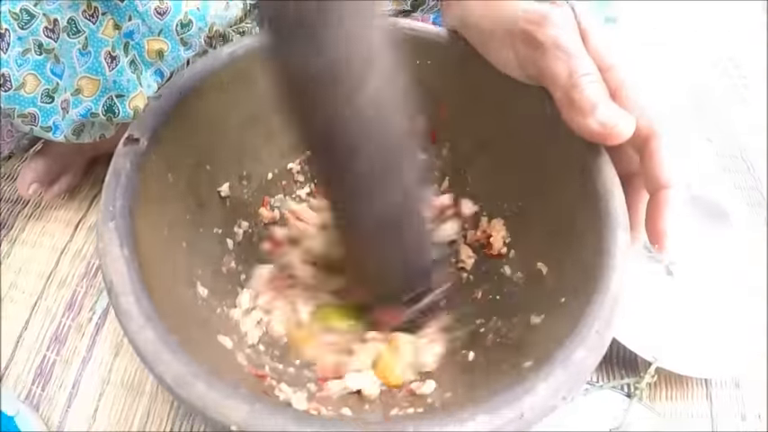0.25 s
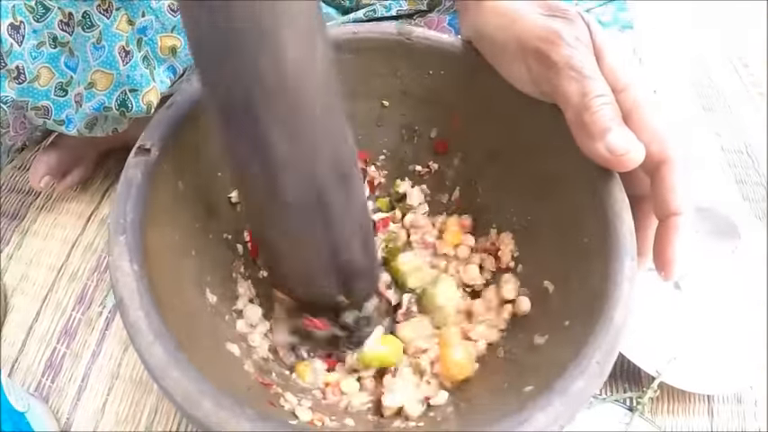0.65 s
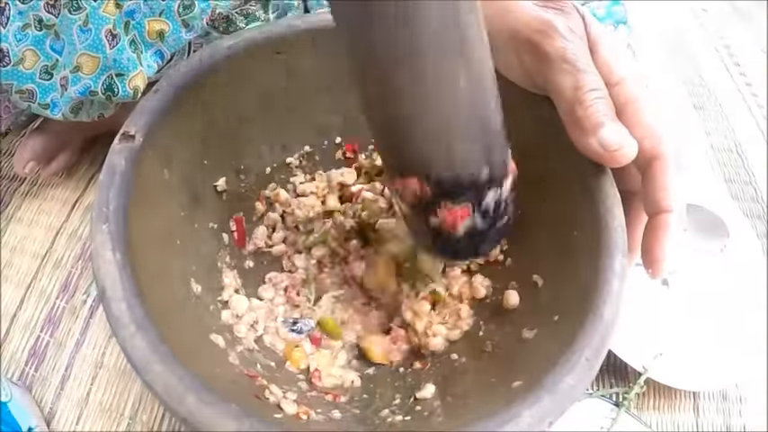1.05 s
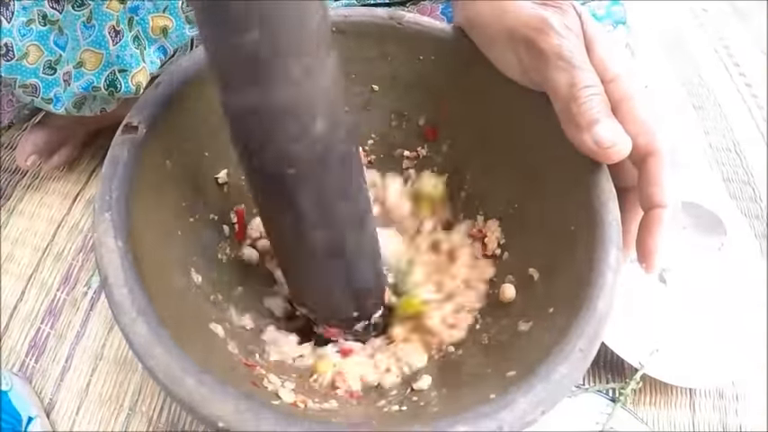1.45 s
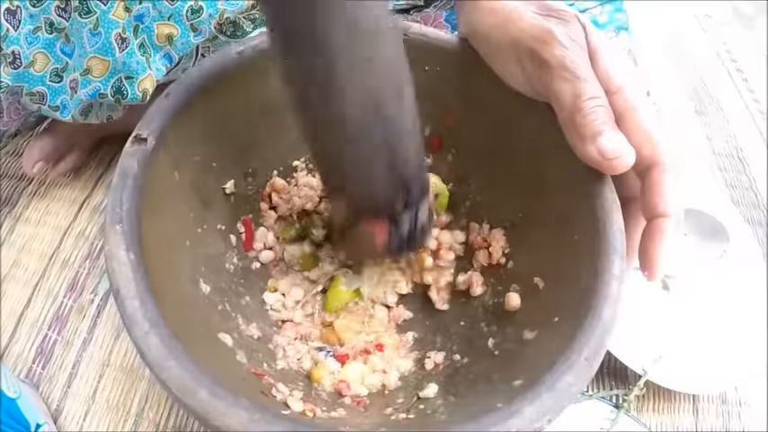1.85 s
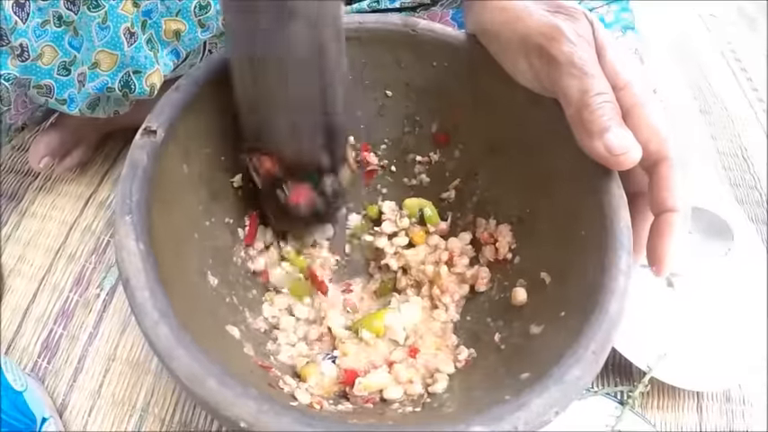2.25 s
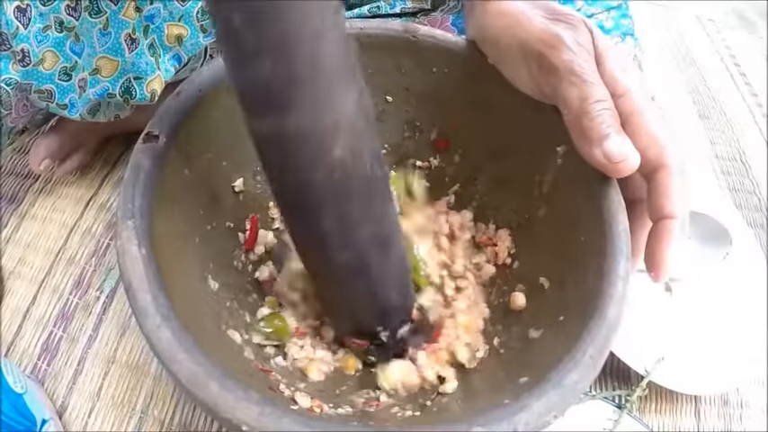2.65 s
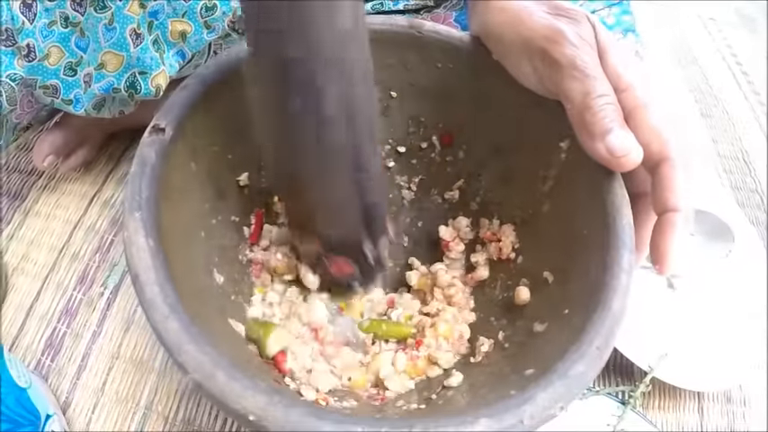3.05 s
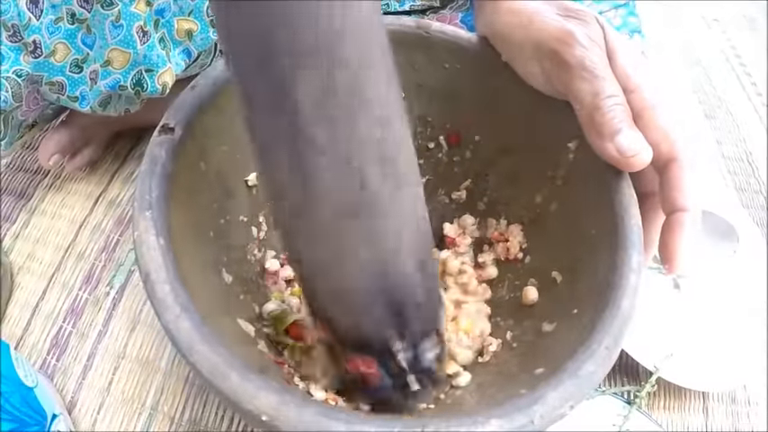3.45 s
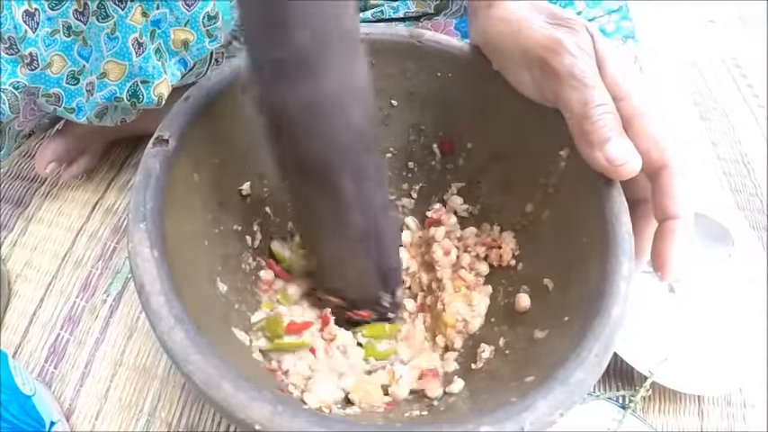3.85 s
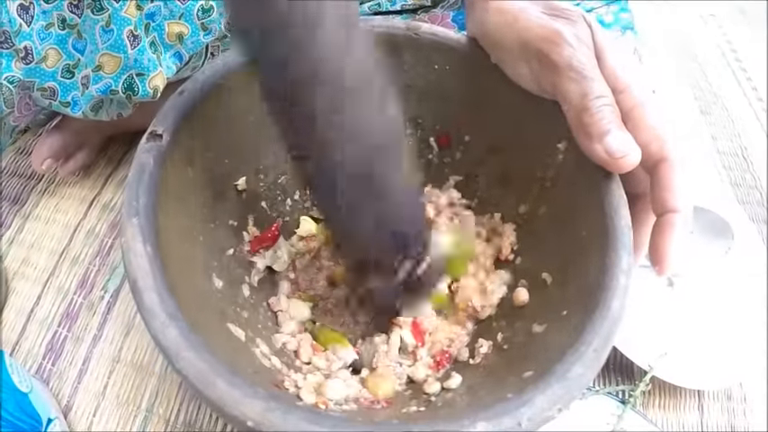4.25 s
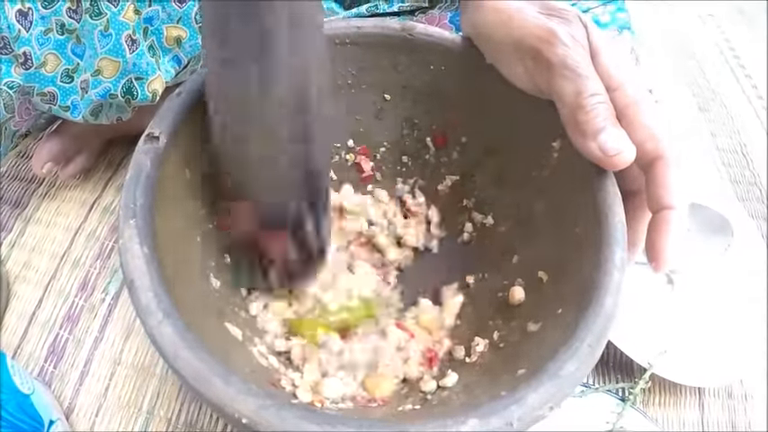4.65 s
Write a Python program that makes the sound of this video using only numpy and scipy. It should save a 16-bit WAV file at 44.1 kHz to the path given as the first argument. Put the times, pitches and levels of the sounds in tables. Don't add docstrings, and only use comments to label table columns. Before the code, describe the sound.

A wooden pestle pounds wet salad in a clay mortar, about three or four crunching strokes a second, with hollow knocks and brief rings.

```python
import sys
import numpy as np
from scipy import signal
from scipy.fft import rfft, irfft
from scipy.io import wavfile
from scipy.ndimage import uniform_filter1d

SR = 44100
rng = np.random.default_rng(int(sys.argv[2]) if len(sys.argv) > 2 else 0)


def convert_level_to_amplitude(level_db):
    exponent = np.asarray(level_db, float) / 20
    return 10 ** exponent


def transcribe(signal):
    frames = np.atleast_2d(signal).T
    limited = np.clip(frames, -1, 1)
    pcm = np.round(limited * 32767).astype(np.int16)
    wavfile.write(sys.argv[1], SR, pcm)


N = 216072


def rms_one(x):
    return x / np.sqrt(np.mean(x ** 2) + 1e-20)


def resonate(x, hz, width_hz):
    r = np.exp(-np.pi * width_hz / SR)
    zeros = [(1 - r * r) / 2, 0, (r * r - 1) / 2]
    poles = [1, -2 * r * np.cos(2 * np.pi * hz / SR), r * r]
    return signal.lfilter(zeros, poles, x)


def body(x, peaks):
    return rms_one(sum((-1) ** k * convert_level_to_amplitude(db) * resonate(x, hz, width_hz)
                       for k, (hz, width_hz, db) in enumerate(peaks)))


def decaying(t, hz, db, t60_s, phase=0.):
    return convert_level_to_amplitude(db - 60 * t / max(t60_s, .002)) * np.sin(2 * np.pi * hz * t + phase)


def add(out, s, sound):
    i = max(round(s * SR), 0)
    out[i:i + len(sound)] += sound[:N - i]


def flicker(per_s):
    r = np.exp(-2 * np.pi * per_s / SR)
    warm_up = 8000
    wander = signal.lfilter([1], [1, -2 * r, r * r], rng.standard_normal(N + warm_up))
    return rms_one(wander[warm_up:])


def grains(per_s, spread_db, clump_db):
    sizes = convert_level_to_amplitude(spread_db * np.minimum(rng.exponential(1, N), 4)) * rng.choice([-1, 1], N)
    happens = rng.random(N) < per_s / SR
    return sizes * happens * convert_level_to_amplitude(clump_db * flicker(66)) + 1e-18


# (frequency [Hz], width [Hz], level [dB])
BOWL_AIR_PEAKS = [(573, 120, -2), (639.3, 69.7, 9), (896, 252, -2), (1520, 674, -12.5), (467, 160, -24.5),
                  (2046, 130, -19.5)]
# (frequency [Hz], width [Hz], level [dB])
CRUNCH_PEAKS = [(3162, 990, 10.5), (3500, 600, 13.5), (4430, 600, 5), (6180, 1350, 0.5)]
# (frequency [Hz], width [Hz], level [dB])
FIZZ_PEAKS = [(7320, 2000, -3), (11150, 2000, -3.5), (15100, 4700, -3.5)]
# (frequency [Hz], width [Hz], level [dB])
MAT_PEAKS = [(54, 27, -1.5), (119, 19, 4.5), (213, 130, -13.5)]


def crushing():
    crunch_db, air_db, fizz_db, mat_db = stroke_levels()
    fine = grains(8200.0, spread_db=0.0, clump_db=-1.0)
    coarse = grains(1400.0, spread_db=3.0, clump_db=8.5)
    wet = np.clip((crunch_db + 58) / 18, .3, 1)
    crunch = body(rms_one(fine) + wet * rms_one(wet_pops(coarse)), CRUNCH_PEAKS)
    crunch = resonate(crunch, 3300, 4000)
    rumble = grains(2500.0, spread_db=1.5, clump_db=3.5)
    low = convert_level_to_amplitude(air_db) * body(rumble, BOWL_AIR_PEAKS) + convert_level_to_amplitude(mat_db) * body(rumble, MAT_PEAKS)
    spray = grains(6000, spread_db=3, clump_db=2.5)
    fizz = sum(convert_level_to_amplitude(db + 3 * flicker(45)) * resonate(spray, hz, width_hz)
               for hz, width_hz, db in FIZZ_PEAKS)
    fizz = convert_level_to_amplitude(fizz_db) * rms_one(fizz)
    crunch = convert_level_to_amplitude(crunch_db + 2.2 * flicker(30)) * rms_one(crunch)
    return crunch * pressed(.002, .012) + fizz + low * pressed(.012, .014)


def wet_pops(clicks, cycles=8.0):
    pitches_hz = np.geomspace(1200, 7500, 14)
    dealt = rng.integers(0, 14, N)
    return sum(resonate(clicks * (dealt == k) + 1e-18, hz, hz / cycles)
               for k, hz in enumerate(pitches_hz))


# (start [s], push until hardest [s], crunch [dB], rumble of the bowl's air [dB], build-up [dB])
STROKES = [(0.0, 0.035, -34, -22.5, 0.5), (0.279, 0.077, -38, -29.5, -3.5), (0.566, 0.05, -29, -23, 9.5),
           (0.874, 0.052, -34.5, -21, -4.5), (1.175, 0.038, -29, -24, 0.5),
           (1.454, 0.068, -34, -26.5, -0.5), (1.729, 0.09, -32.5, -22, 14), (2.056, 0.052, -37, -28, -6.5),
           (2.333, 0.073, -37, -27.5, 10), (2.665, 0.072, -36.5, -27, 5), (2.967, 0.053, -27, -20, 12),
           (3.26, 0.05, -34.5, -24, 18), (3.55, 0.068, -35.5, -25.5, 6.5), (3.832, 0.074, -35.5, -25, 3),
           (4.135, 0.058, -33.5, -25, 19), (4.455, 0.062, -34.5, -24, -1.5), (4.741, 0.08, -37.5, -34, 2.5)]
# (start [s], length [s], crunch [dB], rumble [dB])
RUSTLES = [(0.124, 0.012, -75, -34), (0.391, 0.07, -43.5, -45), (0.475, 0.016, -38.5, -28),
           (1.293, 0.045, -43, -42.5), (2.402, 0.018, -23, -9.5), (2.469, 0.077, -49, -59),
           (3.235, 0.06, -46, -60), (3.35, 0.072, -56, -48.5), (3.698, 0.031, -50, -39.5),
           (3.449, 0.01, -61, -40), (3.95, 0.15, -47, -49), (4.436, 0.021, -50, -68),
           (4.856, 0.045, -55.5, -48), (4.265, 0.051, -52, -51.5), (4.326, 0.037, -55, -69.5),
           (4.565, 0.034, -35, -38)]
# (time [s], fizz [dB])
SPRAYS = [(0.277, -43), (0.918, -52), (1.176, -45.5), (1.205, -47.5), (1.455, -41.5), (1.78, -52.5),
          (1.795, -53), (2.059, -30), (2.698, -44), (2.986, -48), (3.239, -40.5), (3.553, -43),
          (3.832, -47), (4.456, -49.5), (4.79, -50)]
SLIDE_S, SLIDE_LOSS_DB, LET_GO_S = 0.02, 8.5, 0.015
SETTLE_DB, SETTLE_DB_PER_S = (-49, -47.5, -70, -59.5), (100, 130, 70, 30)
SETTLE_FOLLOWS = .3
FIZZ_BUILDS = 0.54
SPLAT_DB, SOFT_ENTRY_DB, SPLAT_S = 10, 4.5, 0.007
RUSTLE_RISE_S, RUSTLE_FADE_DB, RUSTLE_END_DB_PER_S = 0.0036, 9, 907
SPRAY_DB_PER_S = 798.5


def stroke_levels():
    t = np.arange(round(.35 * SR)) / SR
    gains = np.full((4, N), 1e-6)
    for s, push_s, crunch_db, air_db, build_db in STROKES:
        top = layers(crunch_db, air_db)
        slid_s = push_s + SLIDE_S
        gone_s = slid_s + LET_GO_S
        struck = min(abs(s - knock[0]) for knock in KNOCKS) < .015
        splat_db = SPLAT_DB if struck else -SOFT_ENTRY_DB
        rest = np.array(SETTLE_DB) + SETTLE_FOLLOWS * (crunch_db + 32)
        for k, builds in enumerate((1, 1, FIZZ_BUILDS, 1)):
            path_db = [top[k] - builds * build_db, top[k], top[k] - SLIDE_LOSS_DB, rest[k]]
            db = np.interp(t, [0, push_s, slid_s, gone_s], path_db)
            db -= SETTLE_DB_PER_S[k] * np.clip(t - gone_s, 0, None)
            add(gains[k], s, convert_level_to_amplitude(db + splat_db * np.exp(-t / SPLAT_S)))
    for s, length_s, crunch_db, air_db in RUSTLES:
        fade_db = RUSTLE_FADE_DB * t / length_s
        fade_db += RUSTLE_END_DB_PER_S * np.clip(t - length_s, 0, None)
        for k, db in enumerate(layers(crunch_db, air_db)):
            add(gains[k], s, convert_level_to_amplitude(db - fade_db) * (1 - np.exp(-t / RUSTLE_RISE_S)))
    for s, fizz_db in SPRAYS:
        add(gains[2], s, convert_level_to_amplitude(fizz_db - SPRAY_DB_PER_S * t))
    return uniform_filter1d(20 * np.log10(gains), size=130, axis=1)


def layers(crunch_db, air_db):
    return np.array([crunch_db, air_db, crunch_db - 17.5, air_db - 15])


def pressed(lead_s, hold_s):
    t, free = np.arange(N) / SR, np.ones(N)
    for s, *levels in KNOCKS:
        after = t - s
        release = np.exp(-(np.clip(after, 0, None) / hold_s) ** 2)
        free *= 1 - .95 * (after > -lead_s) * release
    return free


# (time [s], thud peak [dB], lower wall mode [dB], upper wall mode [dB], clack [dB])
KNOCKS = [(0.282, -23.5, -30.5, -33.5, -35.5), (0.875, -11, -9, -18, -10),
          (1.179, -30.5, -35.5, -34, -33.5), (1.458, -20.5, -22, -34, -27.5),
          (1.731, -22.5, -38.5, -44, -41.5), (2.061, -8.5, -16.5, -27.5, -42.5),
          (2.332, -12, -47.5, -16, -27.5), (2.407, -36, -38, -37, -37), (2.668, -32, -74, -33.5, -36.5),
          (2.978, -8, -18, -14.5, -12), (3.553, -45, -35, -32.5, -30), (3.833, -6.5, -12.5, -23, -19.5),
          (4.459, -6, -12.5, -54, -31)]
# (frequency [Hz], level [dB], t60 [s])
THUD_MODES = [(396, -21.5, 0.012), (610.5, 8, 0.062), (670, -2, 0.06), (760, -41, 0.018), (1118, -6, 0.026)]
# lower, upper [Hz]
WALL_HZ = (897, 953)
# (frequency [Hz], level [dB], t60 [s])
CLAY_MODES = [(2040, -22.5, 0.12), (2060, -30.5, 0.067), (2750, -30, 0.027)]
# (frequency [Hz], level [dB], t60 [s])
CLACK_MODES = [(1440, 0, 0.022), (1526, 5.5, 0.022), (1690, -0.5, 0.047)]
RING_ON_DB, RING_ON_PER_BARE, RING_ON_T60_S = -28, 1.15, .55


def knocks():
    out, t = np.zeros(N), np.arange(round(.5 * SR)) / SR
    scatter_db = rng.normal(0, 1.2, (len(KNOCKS), len(CLAY_MODES + CLACK_MODES)))
    contact = signal.windows.hann(round(0.00041 * SR) + 3)
    contact = contact / contact.sum()
    no_bass = signal.butter(2, 380, "high", fs=SR, output="sos")
    wall_rise = 1 - np.exp(-t / 0.00069)
    for (s, thud_db, low_db, high_db, clack_db), own in zip(KNOCKS, scatter_db):
        ring_db = max(low_db, high_db)
        bare_db = np.clip(ring_db - thud_db + 7, -8, 13)
        fill = 1 + own[0] / 100
        thud = sum(decaying(t, hz * fill, thud_db + db, min(t60_s, .045), np.pi)
                   for hz, db, t60_s in THUD_MODES)
        thud = signal.sosfilt(no_bass, thud)
        wall_t60_s = 0.11 * convert_level_to_amplitude(0.083 * bare_db)
        ring_on_db = RING_ON_DB + RING_ON_PER_BARE * bare_db
        wall = np.zeros(len(t))
        for hz, db in zip(WALL_HZ, (low_db, high_db)):
            wall += decaying(t, hz, db + 8.0, wall_t60_s)
            wall += decaying(t, hz, db + ring_on_db, RING_ON_T60_S)
        for (hz, db, t60_s), own_db in zip(CLAY_MODES, own):
            wall += decaying(t, hz, ring_db + db + own_db, t60_s)
        for (hz, db, t60_s), own_db in zip(CLACK_MODES, own[len(CLAY_MODES):]):
            wall += decaying(t, hz, clack_db + db + own_db, t60_s)
        add(out, s + 0.0005, np.convolve(thud, contact)[:len(t)] + wall * wall_rise)
    return out


# (time [s], peak [dB], frequency [Hz])
TICKS = [
    (0.2828, -24, 3690),
    (0.8786, -11.5, 3700),
    (1.4568, -24, 3800),
    (1.732, -33, 3800),
    (2.3322, -21.5, 3770),
    (2.9767, -32, 3610),
    (3.5533, -19, 3740),
    (4.4573, -17.5, 3590),
]
# (frequency [Hz], level [dB], t60 [s])
TICK_MODES = [(3540, -16.5, 0.036), (3020, -14.5, 0.028), (4600, -19, 0.061), (5310, -19, .03),
              (6300, -19, 0.023)]


def ticks():
    out, t = np.zeros(N), np.arange(round(.15 * SR)) / SR
    for s, db, hz in TICKS:
        ring = decaying(t, hz, 3, .03) + decaying(t, hz, -9, .09)
        ring += sum(decaying(t, *mode) for mode in TICK_MODES)
        add(out, s, convert_level_to_amplitude(db) * ring * (1 - np.exp(-t / .0015)))
    return out


# (time [s], peak [dB])
THUMPS = [(0.281, -27), (0.48, -37), (0.594, -45), (0.872, -16), (1.178, -33.5), (1.456, -28),
          (1.222, -28.5), (1.727, -22), (1.769, -25.5), (1.788, -30.5), (1.814, -27.5), (3.637, -31.5),
          (2.063, -17.5), (2.327, -30), (2.667, -21.5), (2.978, -18.5), (3.549, -17), (3.835, -16),
          (3.925, -32), (4.46, -44)]
# (frequency [Hz], level [dB], t60 [s])
MAT_MODES = [(59, -11, 0.063), (117, -4.5, 0.041), (203, 8, 0.012)]


def thumps():
    out, t = np.zeros(N), np.arange(round(.2 * SR)) / SR
    shape = sum(decaying(t, hz, db, t60_s, np.pi) for hz, db, t60_s in MAT_MODES)
    shape = shape * (1 - np.exp(-t / 0.001))
    for s, db in THUMPS:
        add(out, s + .002, convert_level_to_amplitude(db) * shape)
    return out


# (time [s], peak [dB], frequency [Hz])
NUDGES = [(0.13, -28.5, 506), (0.208, -32.5, 537), (0.221, -37, 630), (0.232, -31.5, 495),
          (0.304, -27, 970), (0.414, -49, 685), (0.479, -14.5, 560), (0.494, -18, 479), (0.45, -33, 653),
          (0.595, -20.5, 720), (3.3, -31, 650), (4.19, -37.5, 646), (4.8, -29, 665), (1.203, -45, 633),
          (1.224, -21, 676), (1.284, -32.5, 630), (1.524, -51, 670), (1.756, -25, 590), (1.771, -12.5, 592),
          (1.811, -15.5, 652), (2.454, -28, 930), (2.7, -22, 880), (2.745, -21, 760), (2.809, -30.5, 970),
          (3.605, -24, 712), (3.914, -13.5, 670), (4.496, -13, 610), (4.524, -12.5, 577),
          (4.771, -22.5, 670)]


def nudges():
    out, t = np.zeros(N), np.arange(round(.06 * SR)) / SR
    for s, db, hz in NUDGES:
        ring = decaying(t, hz, db + 2.5, .028) + decaying(t, .7 * hz, db - 5, .02)
        add(out, s, ring * (1 - np.exp(-t / 0.0016)))
    return out


# (time [s], peak [dB], broad crack re peak [dB])
SEEDS = [(0.024, -18, -15), (0.3006, -10.5, -10), (0.339, -27, 7.5), (0.573, -24.5, 7.5),
         (0.592, -11.5, -14), (0.641, -28, -7), (0.9183, -23, 15.5), (1.1781, -16.5, -1.5),
         (1.203, -25.5, -21), (1.4673, -15, -5), (1.494, -16, -26), (1.534, -32.5, -8), (1.7803, -30, 9.5),
         (1.8123, -6.5, -29), (2.0591, -10, 2), (2.4073, -19, 3), (2.7346, -38, 22), (2.989, -6, -46),
         (3.0042, -5, -31), (3.2661, -18, -14), (3.2976, -21, -7), (3.8642, -11, -44), (3.8861, -11.5, -19),
         (4.144, -22.5, -13), (4.1669, -19, -26.5), (4.4962, -21, -10), (4.574, -14.5, -10),
         (4.741, -31, -4), (4.7532, -21.5, -8)]
# (time [s], peak [dB], frequency [Hz])
SMACKS = [(0.1297, -35, 1710), (0.399, -23.5, 4600), (0.457, -25, 3730), (0.479, -33.5, 1900),
          (0.4912, -39, 4300), (0.6619, -26.5, 3330), (0.9722, -19, 12100), (1.261, -26, 3340),
          (1.324, -28.5, 3490), (1.757, -33, 3700), (2.171, -30.5, 3100), (2.461, -38, 10900),
          (2.646, -35.5, 3970), (2.7982, -41, 2720), (2.8207, -34, 2570), (2.8836, -33, 3430),
          (2.9053, -42, 3610), (3.055, -23, 3230), (3.0918, -24, 3500), (3.24, -27.5, 5460),
          (3.698, -33.5, 2770), (3.953, -31, 3500), (4.2824, -29.5, 3470), (4.359, -38.5, 4090),
          (4.883, -34, 3130)]
SEED_HZ, SEED_SPREAD, SMACK_CRACK_DB = 3440, .04, -10


def snaps():
    out, t = np.zeros(N), np.arange(round(.015 * SR)) / SR
    seed_hz = SEED_HZ * (1 + SEED_SPREAD * rng.standard_normal(len(SEEDS)))
    rows = [(s, db, hz, crack_db) for (s, db, crack_db), hz in zip(SEEDS, seed_hz)]
    rows += [(s, db, hz, SMACK_CRACK_DB) for s, db, hz in SMACKS]
    noises = rng.standard_normal((len(rows), len(t)))
    for (s, db, hz, crack_db), noise in zip(rows, noises):
        burst = noise * np.exp(-t * hz / 6)
        crack = noise * np.exp(-t / .0012)
        for _ in range(2):
            burst = resonate(burst, hz, .3 * hz)
            crack = resonate(crack, 5500, 3500)
        burst = burst / np.abs(burst).max()
        crack = crack / np.abs(crack).max()
        add(out, s, convert_level_to_amplitude(db - 4.0) * (burst + convert_level_to_amplitude(crack_db) * crack))
    return out


def walls(x, t60_s=0.32):
    t = np.arange(round(.4 * SR)) / SR
    dull = signal.lfilter([.3], [1, -.7], rng.standard_normal(len(t)))
    tail = dull * convert_level_to_amplitude(-60 * t / t60_s) * (t > .006)
    return signal.fftconvolve(x, tail / np.sqrt(np.sum(tail ** 2)))[:N]


# (frequency [Hz], density [dB per Hz])
ROOM_SPECTRUM = [(12, -15.5), (20, -1), (70, -0.5), (106, -17.5), (171, -18), (282, -26.5), (746, -28),
                 (881, -34), (1010, -28.5), (2090, -38), (2270, -31.5), (2470, -37.5), (6540, -42),
                 (14300, -48.5), (15500, -49)]
ROOM_DB = -36.5
HUM_HZ, HUM_WIDTH_HZ, HUM_DB = 55, 10, -53


def room_tone():
    hz = np.maximum(np.fft.rfftfreq(N, 1 / SR), 1)
    table = np.array(ROOM_SPECTRUM)
    colour = convert_level_to_amplitude(np.interp(np.log(hz), np.log(table[:, 0]), table[:, 1]))
    hiss = rms_one(irfft(rfft(rng.standard_normal(N)) * colour, N))
    hum = rms_one(resonate(rng.standard_normal(N), HUM_HZ, HUM_WIDTH_HZ))
    return convert_level_to_amplitude(ROOM_DB - 11.0) * hiss + convert_level_to_amplitude(HUM_DB) * hum


def scene():
    mortar = crushing() + knocks() + ticks() + thumps() + nudges() + snaps()
    return (mortar + convert_level_to_amplitude(-27) * walls(mortar) + room_tone())[None]


def band_limit(x):
    return signal.sosfilt(signal.butter(12, 16520, fs=SR, output="sos"), x)


def record(dry):
    x = 1.074 * np.tanh(dry / 1.307)
    top_cut = signal.ellip(6, 1, 22, 15300, fs=SR, output="sos")
    mix = signal.sosfilt(top_cut, x)
    return band_limit(mix)


dry = scene()
out = record(dry)
transcribe(out)
```